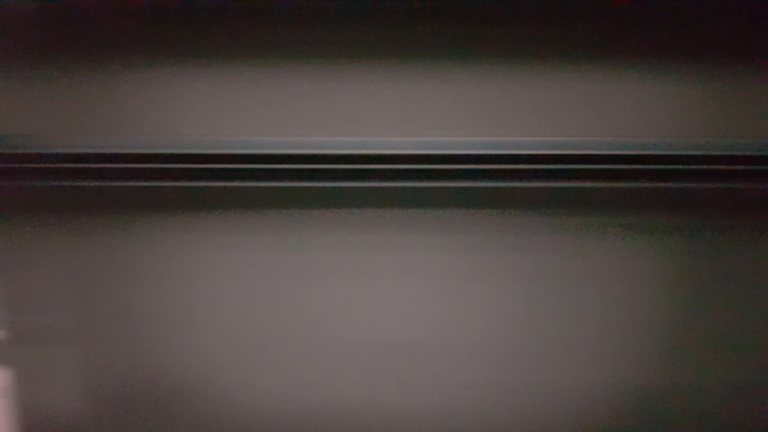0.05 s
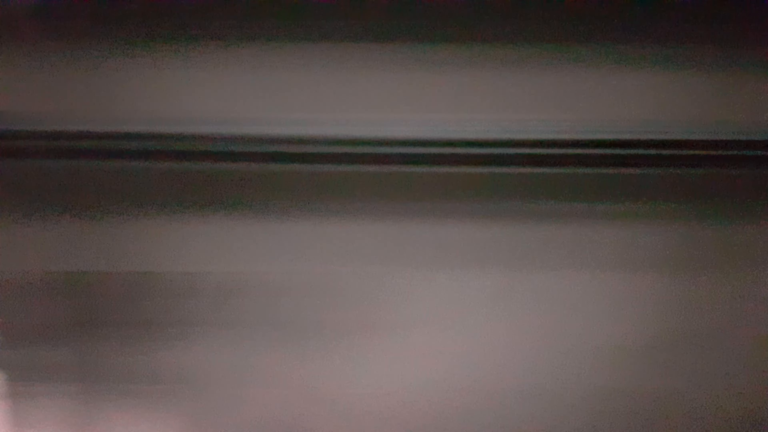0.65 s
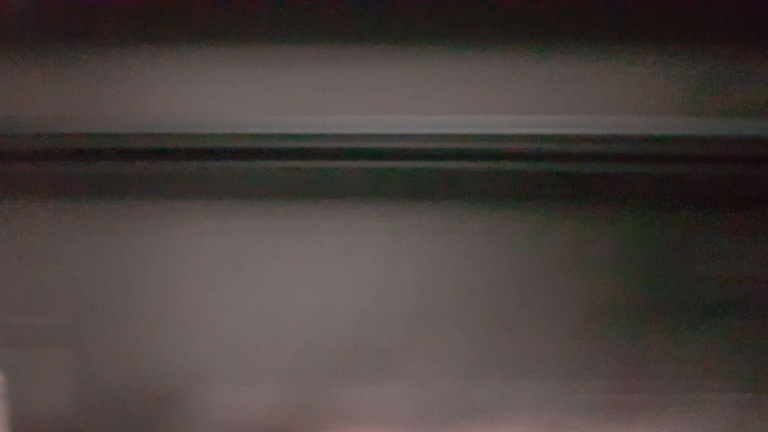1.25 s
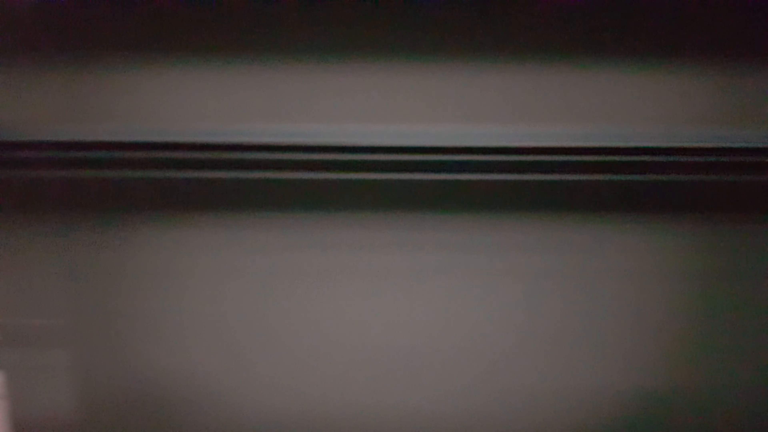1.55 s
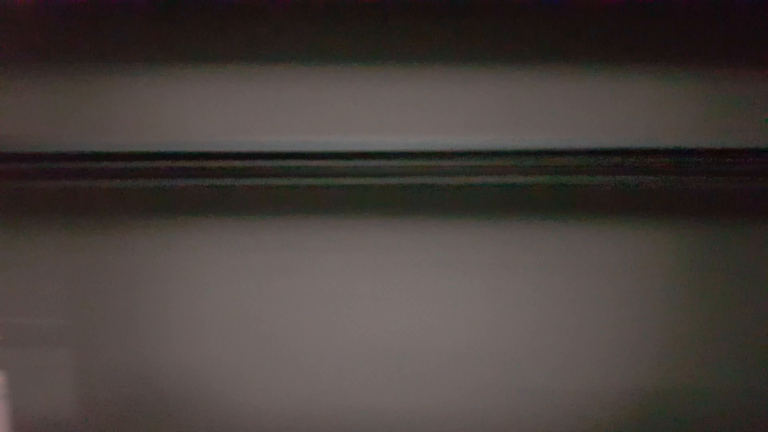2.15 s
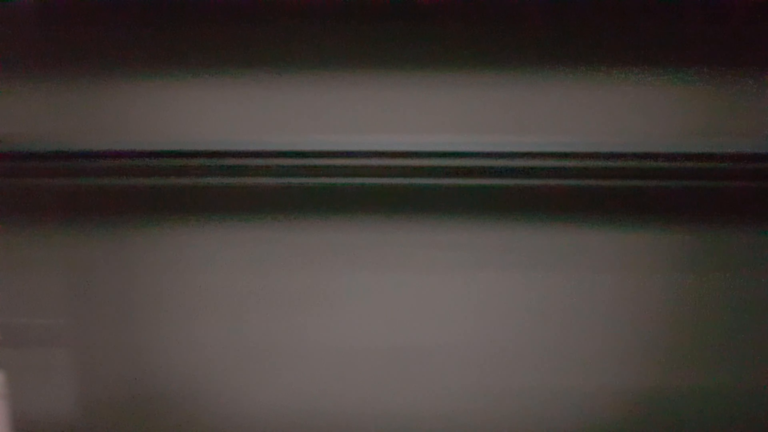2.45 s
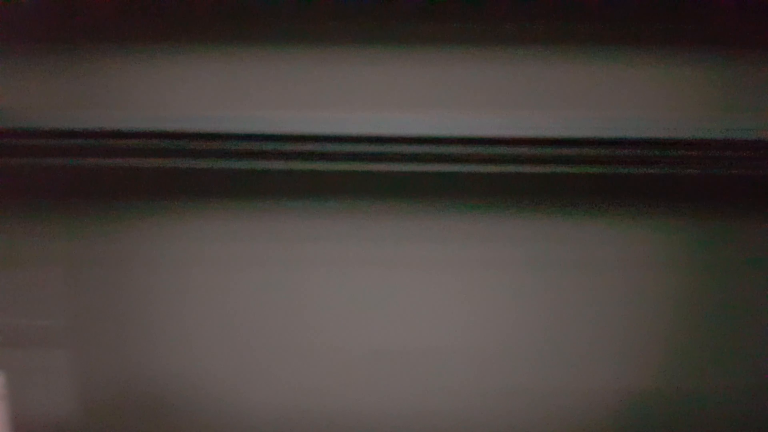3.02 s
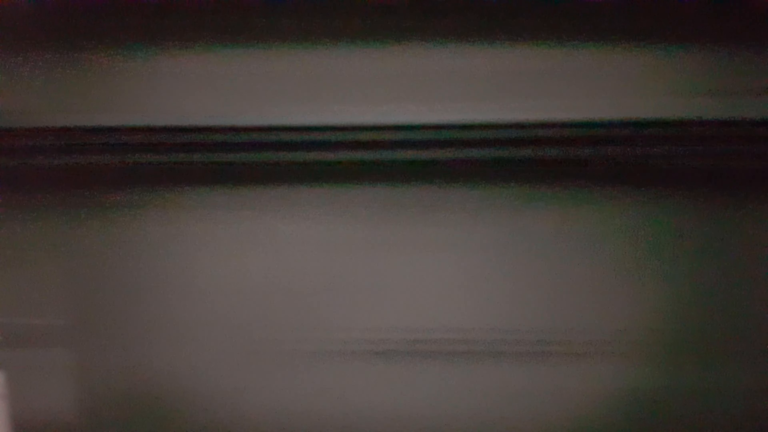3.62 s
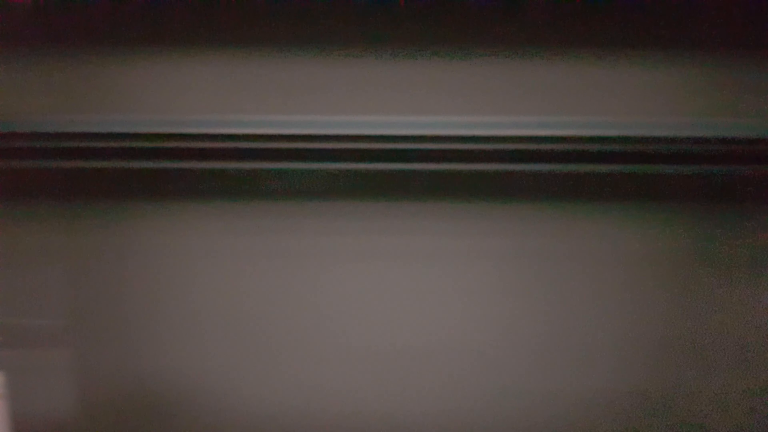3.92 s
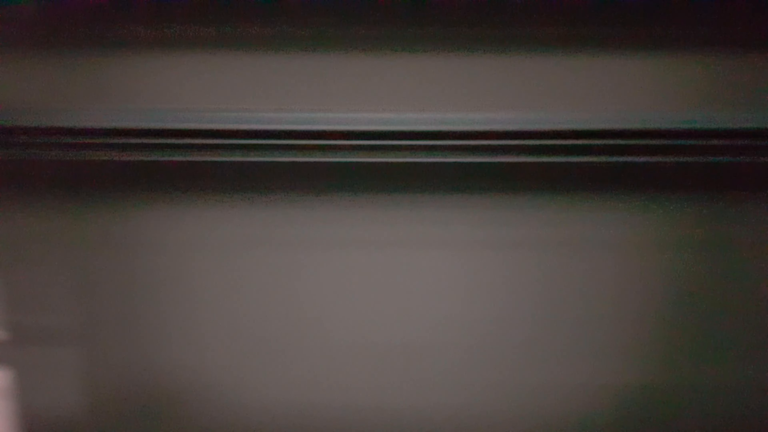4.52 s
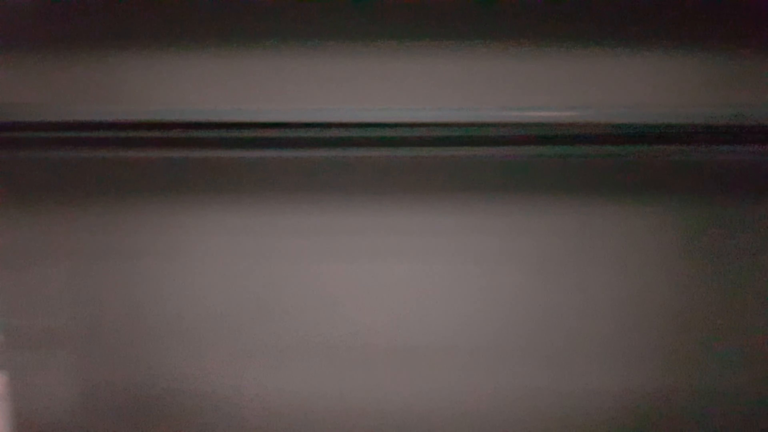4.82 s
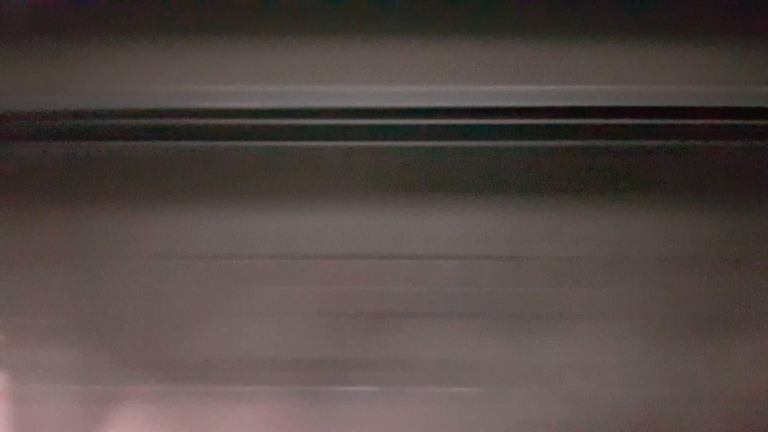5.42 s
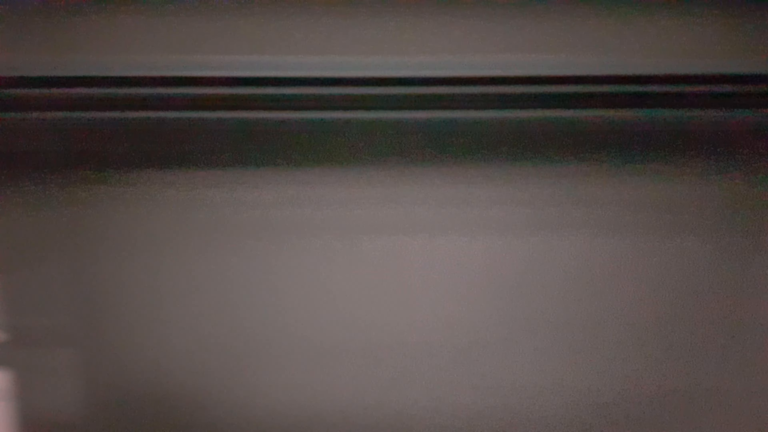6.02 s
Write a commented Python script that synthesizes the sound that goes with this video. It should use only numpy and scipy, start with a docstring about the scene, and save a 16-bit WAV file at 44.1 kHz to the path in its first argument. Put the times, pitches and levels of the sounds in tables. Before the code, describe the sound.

A passenger train runs at a steady speed through a tunnel, heard from a seat inside the carriage. A loud, low cabin drone throbs quickly with the wheels over a deep floor rumble, and short dull thumps come at uneven intervals. Rolling roar, light air hiss and faint wheel ringing come through the window. Near the end, something brushes softly close by on the left.

```python
"""Inside a passenger train, at a seat, as it runs steadily through a tunnel.
Rough rails shake the floor and make the cabin boom; worn wheels throb twice a turn and sometimes thump.
The tunnel throws rolling roar, faint wheel ringing and air hiss back at the window.
Near the end, something brushes briefly close by. The thumps are short tones; the rest is shaped noise."""
import sys
import numpy as np
from scipy import signal
from scipy.fft import rfft, irfft, next_fast_len
from scipy.io import wavfile
from scipy.ndimage import uniform_filter1d, minimum_filter1d, map_coordinates

SR = 44100
rng = np.random.default_rng(int(sys.argv[2]) if len(sys.argv) > 2 else 0)


def to_wav(sig):
    """Store sig (one row per channel, or 1-D mono) as 16-bit WAV at the path in sys.argv[1].

    Samples outside -1..1 are clipped; the rate is SR.
    """
    pcm = np.clip(np.atleast_2d(sig), -1, 1) * 32767
    pcm = np.round(pcm).astype(np.int16)
    wavfile.write(sys.argv[1], SR, pcm.T)  # frames by channels


N = 276507

# Tone colours, as how strong each pitch is next to the others: pitch_hz, relative_db
BRUSH_COLOUR = [(2500, -11.5), (4500, -2.5), (5500, 3.5), (6600, 8.5), (7100, -1.5), (7900, -11),
                (9500, -5.5), (12000, -5.5), (13500, -12.5), (15700, -15)]
HISS_COLOUR = [(700, -27), (1400, 3), (2100, 1), (2650, -2.5), (3300, -3.5), (4200, -4), (5200, -9),
               (6200, -12.5), (6750, -17.5), (7200, -27.5), (7900, -35.5), (11000, -50), (15700, -77)]
SIZZLE_COLOUR = [(5000, -22), (7500, -4), (10500, -1), (11600, -0.5), (12700, -6.5), (13400, -7),
                 (15700, -10)]
ROAR_COLOUR = [(250, -23.5), (380, -1), (480, -3), (630, -1), (800, -2.5), (1050, -6.5), (1250, -9.5),
               (1450, -23), (2200, -54.5), (6000, -100)]

# Resonances, the pitches at which each part likes to ring: pitch_hz, width_hz, relative_db
WHEEL_RINGS = [(1650, 160, -3.5), (1789, 96, 2), (2354, 100, -1.5), (2957, 180, -6)]
WINDOW_RINGS = [(490, 26, 0), (525.5, 41, 0), (757.4, 26, -6), (976, 150, -10.5)]
FLOOR_RINGS = [(27, 18, -7.5), (44, 8, 1)]
BOGIE_RINGS = [(76.7, 22, 0.5), (108, 48, -6), (131.2, 23, -0.5)]  # the bogie is the frame that holds the wheels
CABIN_RINGS = [(155.9, 12, -6.5), (176.8, 36, -7), (211.8, 24.4, -0.5), (223.8, 4.1, -3)]
PANEL_RINGS = [(256.8, 17.6, 2), (271.4, 11, 0.5), (294.5, 11, -3.5), (280.3, 47, -8.5), (352.2, 30, -14),
               (413, 110, -23)]

# Slow swells in loudness; the functions add small offsets and random wavering to these.
# Rushing air and the wheels singing in it: time_s, hiss_db, wheel_db
AIR_LEVELS = [(0, -36, -43), (.35, -35.5, -44), (1.5, -37, -44.5), (1.9, -37.5, -42), (3.3, -39, -45.5),
              (4.5, -39, -46.5), (5.1, -37.5, -41.5), (5.45, -37.5, -47), (6.27, -37.4, -42)]
# Rolling noise off the tunnel wall: time_s, low_roar_db, high_roar_db, window_db
ROAR_LEVELS = [(0, -34.5, -28.5, -33), (1.25, -27, -29, -29.5), (2.3, -29.5, -30.5, -33),
               (2.8, -36.5, -29, -33), (3.5, -37, -31.5, -33.5), (4.2, -31, -31.5, -31.5),
               (4.8, -36.5, -31.5, -32), (5.2, -38.5, -29.5, -27.5), (5.55, -31.5, -32, -32.5),
               (6.27, -32.5, -30.5, -33.5)]
# Shaking from below: time_s, floor_db, bogie_db
RUMBLE_LEVELS = [(0, -25, -26.5), (.35, -39, -26), (1.2, -32, -29), (1.7, -40.5, -31), (2.45, -35, -31),
                 (2.7, -31, -25.5), (3.05, -37.5, -29.5), (3.35, -34.5, -30), (4.7, -41, -29),
                 (5.5, -36, -24), (6.27, -39, -26)]
# The drone in the carriage: time_s, cabin_db, panel_db
DRONE_LEVELS = [(0, -21, -18), (0.55, -18.5, -15.5), (1.45, -15.5, -16), (1.75, -17, -16.5),
                (2.2, -16.5, -15.5), (2.95, -18.5, -17.5), (3.25, -17.5, -15.5), (3.9, -17.5, -19),
                (4.15, -16.5, -19.5), (4.8, -22.0, -20), (5.15, -22.5, -17), (5.6, -21, -20),
                (6.27, -22.5, -23.0)]

# Brief brushing sounds: start_s, peak_db, swell_s, fade_s
BRUSH_STROKES = [(5.627, -41, .066, .125), (6.064, -49.5, 0.0028, .055)]
# How fast the wheels spin: time_s, turns_per_s
WHEEL_SPEED = [(0, 7.3), (1.2, 7.44), (3.8, 7.47), (4.4, 7.57), (5.3, 7.44)]
# The hardest wheel thumps: peak_time_s, peak_db, pitch_hz
WHEEL_THUMPS = [(.085, -12, 243), (.212, -7, 251.4), (.68, -11.5, 204), (1.333, -10.5, 247.4),
                (1.49, -8, 216), (2.206, -7.5, 255), (2.64, -11, 233.4), (2.775, -9, 206),
                (3.235, -8, 255.6), (3.783, -6.5, 208), (4.045, -9, 222), (4.769, -14.5, 252.6),
                (5.164, -9.5, 259)]
# How alike the two sides sound (1 is the same, 0 is unrelated): pitch_hz, likeness
STEREO_LIKENESS = [(80, .995), (130, .96), (180, .92), (300, .92), (370, .82), (415, .1), (540, .68),
                   (650, -.1), (770, .35), (900, -.25), (1250, -.6), (1850, -.2), (2200, .38), (2600, .3),
                   (3000, -.05)]
# How much louder the left side is: pitch_hz, left_minus_right_db
STEREO_BALANCE = [(60, 1.4), (250, 1.1), (500, 2.4), (1400, 1), (2300, 1.6), (4000, 6), (6500, 17),
                  (9300, 14), (10800, 5), (14000, 2)]


def amp(db):
    """Turn decibels into a number to multiply by."""
    return 10 ** (np.asarray(db) / 20)


def unit(x):
    """Scale a signal so that its average strength (rms) is 1."""
    return x / np.sqrt(np.mean(x ** 2) + 1e-20)


def at_pitch(points, hz):
    """Look up a value between the rows of a pitch table, on a log scale."""
    pitches, values = np.transpose(points)
    return np.interp(np.log(hz + 1), np.log(pitches + 1), values)


def curves(rows):
    """Join the rows of a time table with straight lines, one curve per value column."""
    times, *columns = np.transpose(rows)
    return [np.interp(np.arange(N) / SR, times, column) for column in columns]


def wobble(rate):
    """A smooth curve through `rate` random values a second."""
    values = rng.standard_normal(int(N * rate / SR) + 4)
    return map_coordinates(values, [np.arange(N) * rate / SR])


def filtered(x, response):
    """Turn each pitch in x up or down by response(hz)."""
    size = next_fast_len(N + SR // 2)
    return irfft(rfft(x, size) * response(np.fft.rfftfreq(size, 1 / SR)), size)[..., :N]


def broad(colour):
    """A smooth filter shape from a tone colour table."""
    return lambda hz: amp(at_pitch(colour, hz))


def resonant(rings):
    """A filter shape with one steep peak for each resonance."""
    def response(hz):
        power = 0
        for pitch, width, db in rings:
            off_pitch = (hz ** 2 - pitch ** 2) / (width * (hz + 1e-3))
            power += (amp(db) / (1 + off_pitch ** 2)) ** 2
        return np.sqrt(power)
    return response


def noise(response, patchy_db):
    """Filtered stereo noise of strength 1, with drifting louder and softer patches."""
    def stereo_response(hz):
        angle = np.arccos(at_pitch(STEREO_LIKENESS, hz)) / 2
        return response(hz) * np.array([np.cos(angle), np.sin(angle)])
    spectra = signal.stft(rng.standard_normal((2, N)), nperseg=1024)[2]
    patches = uniform_filter1d(rng.standard_normal(spectra.shape[1:]), size=6, axis=0)  # blur over pitch
    patches = uniform_filter1d(patches, size=12, axis=1)  # blur over time
    pair = signal.istft(spectra * amp(patchy_db * unit(patches)), nperseg=1024)[1][:, :N]
    middle, side = filtered(pair, stereo_response)
    return unit(np.array([middle + side, middle - side]))


def steady_ring(rings, patchy_db, evenness, smooth_s):
    """Ringing noise, evened out: unbroken rolling keeps it from dying away or building far."""
    ring = noise(resonant(rings), patchy_db)
    power = np.abs(uniform_filter1d(np.mean(ring ** 2, axis=0), int(smooth_s * SR)))
    return unit(ring / (power + .02) ** (evenness / 2))


def brushing(touch_db=-9.5, fade_db=-24.5, grain_db=1.5):
    """Something brushes close by: a soft, grainy sound that touches, swells and fades."""
    t = np.arange(N) / SR
    strokes = np.zeros(N)
    for start_s, peak_db, swell_s, fade_s in BRUSH_STROKES:
        past_peak = t - start_s - swell_s
        shape_db = np.where(past_peak < 0, -touch_db * past_peak / swell_s, fade_db * past_peak / fade_s)
        strokes += (t >= start_s) * amp(peak_db + shape_db)
    grain = amp(grain_db * wobble(540))
    return strokes * unit(grain * noise(broad(BRUSH_COLOUR), patchy_db=-.5))


def rushing_air():
    """Air hisses along the carriage, brighter as it grows; the wheel discs ring faintly through it."""
    hiss_db, wheel_db = curves(AIR_LEVELS)
    sizzle_db = -67.5 + 1.5 * (hiss_db - hiss_db.mean())  # swells more than the hiss does
    hiss = amp(hiss_db + .14 * wobble(9)) * noise(broad(HISS_COLOUR), patchy_db=.7)
    wheels = amp(wheel_db + .8 * wobble(6.3)) * noise(resonant(WHEEL_RINGS), patchy_db=1.5)
    sizzle = amp(sizzle_db + .6 * wobble(12)) * noise(broad(SIZZLE_COLOUR), patchy_db=.5)
    return hiss + wheels + sizzle


def tunnel_roar(split_hz=518):
    """The roar of rolling wheels bounces off the tunnel wall and makes the window ring."""
    low_db, high_db, window_db = curves(ROAR_LEVELS)
    roar = broad(ROAR_COLOUR)
    low_share = lambda hz: 1 / (1 + (hz / split_hz) ** 8)
    low = amp(low_db) * noise(lambda hz: roar(hz) * np.sqrt(low_share(hz)), patchy_db=.1)
    high = amp(high_db) * noise(lambda hz: roar(hz) * np.sqrt(1 - low_share(hz)), patchy_db=.44)
    window_gain = amp(window_db + 1.03 + 1.3 * wobble(10))
    window = steady_ring(WINDOW_RINGS, patchy_db=1.7, evenness=1, smooth_s=.14)
    return low + high + window_gain * window


def floor_rumble():
    """Rough rails shake the floor and the bogie, unevenly from metre to metre."""
    floor_db, bogie_db = curves(RUMBLE_LEVELS)
    floor_gain = amp(floor_db + 1 + 1.6 * wobble(9))
    floor = steady_ring(FLOOR_RINGS, patchy_db=.5, evenness=.45, smooth_s=.12)
    bogie_gain = amp(bogie_db - .24 + 1.5 * wobble(12))
    bogie = steady_ring(BOGIE_RINGS, patchy_db=.7, evenness=.55, smooth_s=.12)
    return floor_gain * floor + bogie_gain * bogie


def wheel_thumps(rise_s=.009, fall_s=.018):
    """A flat spot on a wheel hits the rail; the cabin panels swell and ring for a moment."""
    lead = SR // 10  # samples before each peak
    t = np.arange(-lead, SR // 5) / SR
    swell = np.exp(-(t / np.where(t < 0, rise_s, fall_s)) ** 2)
    thumps = np.zeros(N + SR)
    for peak_time_s, peak_db, pitch_hz in WHEEL_THUMPS:
        tone = np.sin(2 * np.pi * (pitch_hz * t + rng.random()))
        start = round(peak_time_s * SR)
        thumps[start:start + len(t)] += amp(peak_db) * swell * tone
    return thumps[lead:lead + N]


def wheel_throb(depth):
    """Worn patches press on the rail twice a turn, swinging the load by the fraction `depth`."""
    turns = np.cumsum(curves(WHEEL_SPEED)[0]) / SR
    return 1 + depth * np.cos(4 * np.pi * (turns - .03))


def cabin_drone():
    """The cabin air booms and the wall panels drone; both surge with the rail and throb with the wheels."""
    cabin_db, panel_db = curves(DRONE_LEVELS)
    cabin_ring = steady_ring(CABIN_RINGS, patchy_db=.3, evenness=.65, smooth_s=.08)
    panel_ring = steady_ring(PANEL_RINGS, patchy_db=.3, evenness=.7, smooth_s=.07)
    surge = amp(.9 * wobble(10))
    cabin = amp(cabin_db - .2) * cabin_ring * wheel_throb(depth=.14)
    panels = amp(panel_db + .06) * panel_ring * wheel_throb(depth=.23)
    return surge * (cabin + panels)


def scene():
    """Everything as it reaches the seat; the right side is shaded from the high pitches."""
    def shade(hz):
        left = amp(at_pitch(STEREO_BALANCE, hz))
        return np.array([left, np.ones_like(left)]) * np.sqrt(2 / (1 + left ** 2))
    mix = floor_rumble() + cabin_drone() + wheel_thumps() + tunnel_roar() + rushing_air() + brushing()
    return filtered(mix, shade)


def record(dry, ceiling=.93, top_hz=15740):
    """Turn the loudest peaks down smoothly, then cut every pitch above top_hz."""
    needed_gain = np.minimum(1, ceiling / (np.abs(dry).max(axis=0) + 1e-9))
    gain = uniform_filter1d(minimum_filter1d(needed_gain, size=881), size=881)  # 20 ms windows
    return filtered(dry * gain, lambda hz: hz < top_hz)


dry = scene()
out = record(dry)
to_wav(out)
```